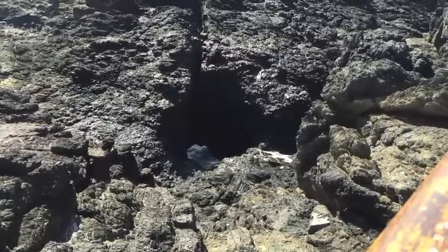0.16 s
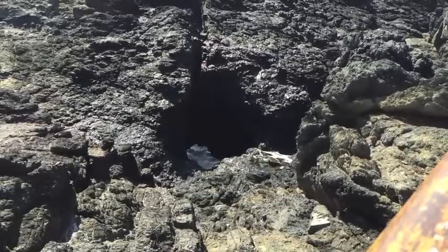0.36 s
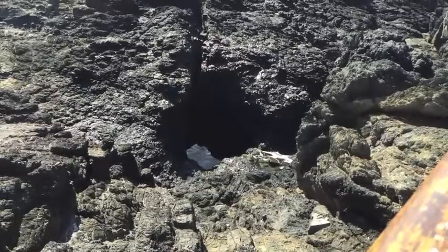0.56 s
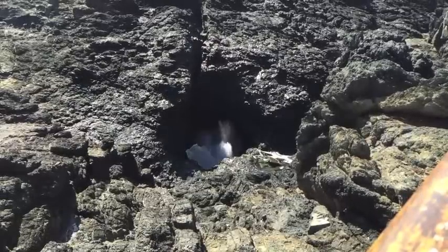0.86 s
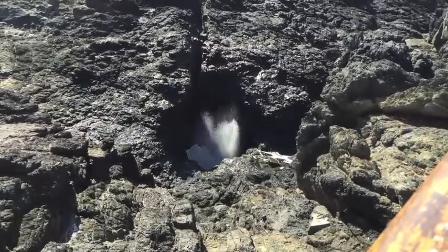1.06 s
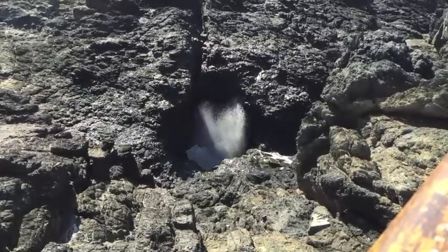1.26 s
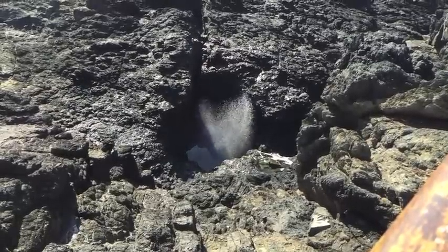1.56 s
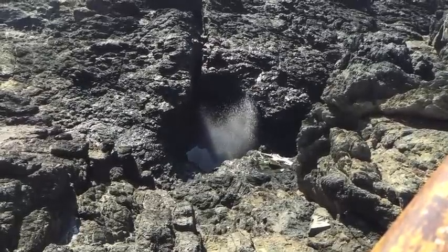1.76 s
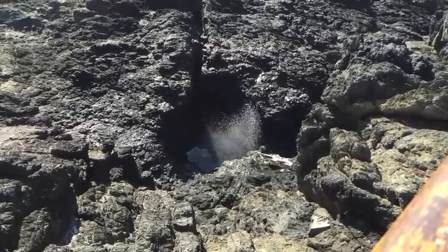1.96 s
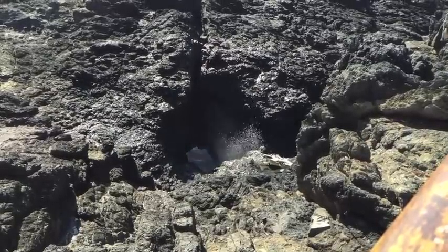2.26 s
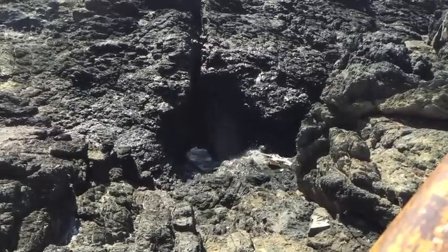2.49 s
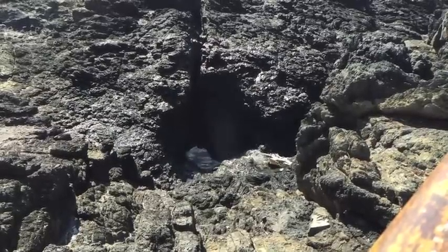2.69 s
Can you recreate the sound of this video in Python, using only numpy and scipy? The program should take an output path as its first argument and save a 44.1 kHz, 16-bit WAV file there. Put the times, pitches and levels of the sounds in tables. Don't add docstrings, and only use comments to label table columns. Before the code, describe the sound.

Water surges and sprays from a rock cavity outdoors; sloshing slaps come first, a softer wash follows, then a longer spray rush, while fluttering wind rumble thumps the microphone, easing midway and peaking near the end.

```python
import sys
import numpy as np
from scipy import signal
from scipy.fft import rfft, irfft
from scipy.io import wavfile
from scipy.ndimage import uniform_filter1d

SR = 44100
rng = np.random.default_rng(int(sys.argv[2]) if len(sys.argv) > 2 else 0)


def voltage_ratio(level):
    return 10 ** (np.asarray(level, float) / 20)


def transcribe(u):
    v = np.clip(np.atleast_2d(u).T, -1, 1)
    q = np.round(v * 32767).astype(np.int16)
    wavfile.write(sys.argv[1], SR, q)


N = 124803
T = np.arange(N) / SR
F = np.maximum(np.arange(N // 2 + 1) * SR / N, 1.)


def unit(x):
    return x / np.sqrt(np.mean(x ** 2))


def walk(rate_hz):
    hold = int(SR / rate_hz)
    steps = np.repeat(rng.standard_normal(N // hold + 1), hold)
    return unit(uniform_filter1d(uniform_filter1d(steps, hold), hold)[:N])


def textured(source, colour, shared_db, own_db, rate_hz):
    hz, db = np.array(colour).T
    below_octaves = np.maximum(np.log2(hz[0] / F), 0)
    spectrum = rfft(source) * voltage_ratio(np.interp(np.log(F), np.log(hz), db) - 26 * below_octaves)
    out, swell = 0, walk(rate_hz / 3)
    for centre in np.arange(np.log2(hz[0]) - 1, np.log2(hz[-1]) + .5, .5):
        band = np.cos(np.pi * np.clip(np.log2(F) - centre, -.5, .5)) ** 2
        out = out + irfft(spectrum * band, N) * voltage_ratio(shared_db * swell + own_db * walk(rate_hz))
    return unit(out)


def add_swing(out, at_s, db, hz, width_s, phase):
    sag = 0.23
    first = max(0, int((at_s - 4 * width_s) * SR))
    i = np.arange(first, min(N, int((at_s + 4 * width_s) * SR)))
    u = i / SR - at_s
    bell = np.exp(-.5 * (u / width_s) ** 2)
    turns = hz * u * (1 - sag * np.tanh(u / width_s / 2))
    out[i] += voltage_ratio(db) * bell * np.cos(2 * np.pi * turns + phase)


def eddies(rows):
    crest_spread_rad = 0.67
    eddy_turns, wake_turns, wake_late_turns = 0.53, 0.75, 0.59
    wake_db, wake_slower = -3, 0.56
    out = np.zeros(N)
    phases = crest_spread_rad * rng.standard_normal((len(rows), 2))
    for (at_s, db, hz), (p, q) in zip(rows, phases):
        add_swing(out, at_s, db, hz, eddy_turns / hz, p)
        slow_hz = hz * wake_slower
        add_swing(out, at_s + wake_late_turns / hz, db + wake_db, slow_hz, wake_turns / slow_hz, q)
    return out


def surge_power(at_s, db, rise_s, fall_s):
    rise = np.exp(-2 * ((T - at_s) / rise_s) ** 2)
    return voltage_ratio(2 * db) * np.where(T < at_s, rise, voltage_ratio(-120 * (T - at_s) / fall_s))


def gusts():
    # (time [s], level [dB])
    gust_levels = [(0, -33), (.07, -32.5), (.15, -27), (.32, -30.5), (.57, -31.5), (.7, -29), (.84, -37),
                   (1.0, -41), (1.25, -38), (1.37, -38), (1.41, -46), (1.6, -40), (1.79, -42.5),
                   (2.21, -34), (2.45, -43), (2.618, -37), (2.72, -27), (2.83, -38)]
    # (frequency [Hz], density [dB per Hz])
    rumble_colour = [(25, -28), (45, -2.5), (75, -1), (150, -3.5), (250, -13.5), (400, -20), (700, -22.5),
                     (900, -76)]
    stray_count, stray_hz, stray_spread, stray_scatter_db, stray_db = 260, 150, 0.36, 4, -2.5
    rumble = textured(rng.standard_normal(N), rumble_colour, shared_db=1.5, own_db=2.3, rate_hz=45)
    at_s = rng.uniform(0, N / SR, stray_count)
    db = stray_scatter_db * np.minimum(rng.exponential(size=stray_count), 2.5)
    hz = np.minimum(stray_hz * np.exp(stray_spread * rng.standard_normal(stray_count)), 650)
    stray = unit(eddies(list(zip(at_s, db, hz))))
    return (rumble + voltage_ratio(stray_db) * stray) * voltage_ratio(np.interp(T, *np.array(gust_levels).T))


def surf():
    # (frequency [Hz], density [dB per Hz])
    surf_colour = [(150, 6.5), (450, -7.5), (700, -0.5), (1100, -1.5), (2000, -6.5), (4000, -9.5),
                   (8000, -15), (15500, -23)]
    # (time [s], level [dB])
    treble_ebb = [(0, -5), (.5, 2), (.93, -0.5), (1.06, -3), (1.2, -3), (1.38, -5), (2.6, 8), (2.83, -2)]
    # (time [s], level [dB])
    surf_swell = [(0, -0.5), (.15, 1.5), (.4, -0.5), (.9, -0.5), (1.15, 1), (1.3, -0.5), (2.0, 0),
                  (2.83, -1)]
    surf_db = -44.5
    wash = textured(rng.standard_normal(N), surf_colour, shared_db=0.3, own_db=1.04, rate_hz=13.6)
    treble = signal.sosfilt(signal.butter(1, 4000, "high", fs=SR, output="sos"), wash)
    wash = wash + treble * (voltage_ratio(np.interp(T, *np.array(treble_ebb).T)) - 1)
    return voltage_ratio(surf_db + np.interp(T, *np.array(surf_swell).T)) * wash


def flutters():
    # (start [s], length [s], peak [dB], swing rate [Hz])
    runs = [
        (0.00197, 0.029, -25, 260),
        (0.0034, 0.012, -25.5, 450),
        (.1, 0.09, -22, 170),
        (2.675, 0.053, -28.5, 450),
        (2.5, 0.045, -34, 150),
    ]
    gap_turns, spread, uneven_db = 1.6, 0.205, 1.5
    rows = []
    for start_s, length_s, db, hz in runs:
        a, b, c = rng.standard_normal((30, 3)).T
        at_s = start_s + np.cumsum(gap_turns / hz * np.exp(spread * a))
        fade_db = -40 * np.maximum((at_s - start_s) / length_s - 1, 0) ** 2
        rows += zip(at_s, db + fade_db + uneven_db * b, hz * np.exp(spread * c))
    return eddies(rows)


def slosh():
    # (time [s], level [dB], rise [s], fall t60 [s])
    sloshes = [
        (.006, -40, .003, .12),
        (.15, -52, .05, .8),
        (.31, -44, .05, 1.3),
        (.45, -47, .05, .8),
        (.57, -37.5, .04, 0.65),
        (.66, -47, .03, .6),
        (1.3, -54.5, 0.11, 1.3),
        (1.54, -51, .06, 1.5),
    ]
    # (frequency [Hz], density [dB per Hz])
    hollow_colour = [(350, -4), (550, -0.5), (750, 0.5), (950, -2.5), (1300, -15), (2000, -25)]
    power = sum(surge_power(*row) for row in sloshes)
    hollow = textured(rng.standard_normal(N), hollow_colour, shared_db=2.0, own_db=1.5, rate_hz=28)
    return np.sqrt(power) * hollow


def buffets():
    # (time [s], peak [dB], swing rate [Hz])
    early_buffets = [(0.016, -16, 270), (0.09, -22.5, 388), (0.102, -19.5, 540), (0.115, -16, 230),
                     (0.131, -23, 420), (0.146, -18.5, 196), (0.164, -28, 224.4), (0.196, -19, 386),
                     (0.217, -18, 190), (0.236, -28, 175), (0.255, -12.5, 247), (0.286, -13, 250),
                     (0.358, -17.5, 195), (0.371, -20, 161), (0.397, -15, 254), (0.424, -19, 330),
                     (0.443, -23.5, 387), (0.499, -21.5, 176.0), (0.603, -19.5, 298), (0.624, -18.5, 205),
                     (0.642, -25, 175), (0.656, -33, 276), (0.694, -25.5, 141), (0.724, -21.5, 155),
                     (0.767, -29.5, 222.0), (0.781, -23, 172), (0.815, -23, 154), (0.821, -27.5, 563),
                     (0.828, -32, 122.5)]
    # (time [s], peak [dB], swing rate [Hz])
    mild_buffets = [(.249, -18.5, 560), (.263, -23, 144), (.3, -26, 260), (.318, -25, 200),
                    (.508, -27, 266), (.516, -23.5, 335), (.529, -26, 150), (.537, -32, 480),
                    (.553, -31, 620), (.611, -22, 216), (.674, -28, 302), (.8, -30, 282), (1.213, -24, 170),
                    (1.224, -26, 150), (1.233, -33.5, 400), (1.293, -26, 200), (1.32, -26, 245),
                    (1.381, -26, 192), (1.472, -32.5, 196), (1.728, -27, 130), (1.742, -28.5, 168),
                    (1.853, -28.5, 170), (1.886, -32, 169), (1.985, -28, 325), (2.022, -32, 150),
                    (2.3, -28, 130), (2.331, -27, 228), (2.388, -27, 202), (2.48, -27.5, 135),
                    (2.585, -28, 300), (2.6, -22, 130)]
    # (time [s], peak [dB], swing rate [Hz])
    late_buffets = [(1.04, -21, 597), (1.054, -24, 420), (1.068, -32, 175), (1.204, -25.5, 422),
                    (1.237, -24.5, 160), (1.265, -28, 175), (1.302, -24.0, 370), (1.315, -26, 295),
                    (1.39, -23, 252), (1.562, -27.5, 198), (1.688, -23.5, 286), (1.751, -23.5, 192),
                    (1.97, -28, 245), (1.992, -24.0, 272), (2.054, -28, 280.0), (2.063, -25.5, 98.0),
                    (2.088, -24.5, 156), (2.127, -23, 171), (2.15, -26, 176.0), (2.203, -19.5, 156.4),
                    (2.225, -20, 192), (2.267, -25, 234), (2.342, -18.5, 193), (2.378, -18, 244),
                    (2.425, -21.5, 169), (2.517, -28, 211), (2.561, -24.5, 283), (2.572, -17, 214),
                    (2.634, -18.5, 264), (2.657, -15.5, 373)]
    # (time [s], peak [dB], swing rate [Hz])
    last_gust = [(2.668, -13.5, 170), (2.682, -20, 400), (2.689, -15.5, 200), (2.7, -18, 257),
                 (2.706, -15.5, 224), (2.712, -27, 600), (2.72, -20, 380), (2.729, -13, 168),
                 (2.737, -27.5, 556), (2.744, -13.5, 138), (2.756, -19.5, 200), (2.772, -19, 233),
                 (2.785, -27, 201), (2.802, -30, 170), (2.809, -25, 302), (2.824, -30, 130)]
    return eddies(early_buffets) + eddies(mild_buffets) + eddies(late_buffets) + eddies(last_gust)


def heaves():
    # (onset [s], peak [dB], swing rate [Hz])
    heave_rows = [(0.134, -26.5, 75), (0.177, -20, 83.4), (0.251, -20, 128), (0.382, -17, 127),
                  (0.489, -18.5, 96.5), (0.589, -21.5, 84), (0.684, -18.5, 92), (1.031, -23, 76.5),
                  (1.278, -29, 78.1), (1.64, -25, 67.3), (1.7, -23, 54.7), (1.79, -30, 42),
                  (1.835, -28, 86), (1.93, -29, 55.5), (1.978, -24, 93), (2.053, -24, 71),
                  (2.116, -20.5, 115), (2.189, -21, 121.6), (2.21, -27, 48), (2.276, -25, 48),
                  (2.331, -20.5, 75.4), (2.47, -26, 60), (2.542, -25, 77), (2.725, -11.5, 80)]
    rise_s, width_s = 0.0202, 0.012
    out = np.zeros(N)
    for onset_s, db, hz in heave_rows:
        add_swing(out, onset_s + rise_s, db - 3, hz, width_s, rng.uniform(-np.pi, np.pi))
    return out


def drops():
    drops_per_s, scatter_db, share = 5000, 1.5, 0.22
    n = int(drops_per_s * N / SR)
    clicks = np.zeros(N)
    sizes = voltage_ratio(scatter_db * np.minimum(rng.exponential(size=n), 4.5))
    np.add.at(clicks, rng.integers(0, N, n), rng.choice([-1, 1], n) * sizes)
    return np.sqrt(share) * unit(clicks) + np.sqrt(1 - share) * rng.standard_normal(N)


def surges():
    # (time [s], level [dB], rise [s], fall t60 [s], spray share [0-1])
    surge_rows = [(.325, -38, 0.077, 1.7, 0.07), (.33, -45, .07, 0.54, 0.95),
                  (.578, -36, 0.031, 0.46, 0.02), (.625, -42.5, 0.06, 0.9, 0.85), (.80, -47, .03, 0.24, 0),
                  (1.45, -44.5, 0.13, 9.8, 0.03), (1.63, -38.5, 0.13, 3.7, 0.28),
                  (1.93, -42, 0.15, 3.8, 0.53), (2.3, -46, 0.61, 5.5, 0.9), (2.62, -40.5, 0.049, 2, .95),
                  (2.69, -56, .02, 1.3, .95)]
    # (frequency [Hz], density [dB per Hz])
    churn_colour = [(300, -4), (450, -6), (700, 2.5), (1100, 2.5), (2000, -7), (4000, -14), (8000, -28.5),
                    (15500, -23)]
    # (frequency [Hz], density [dB per Hz])
    spray_colour = [(400, -18), (1000, -20), (2500, 0), (6000, -3.5), (9000, -8.5), (12000, -15),
                    (15500, -16.5)]
    end_s, end_db, end_fade_s = 2.5, -7, 0.033
    ending = voltage_ratio(end_db * (1 + np.tanh((T - end_s) / end_fade_s)))
    churn_power = spray_power = 0
    for at_s, db, rise_s, fall_s, bright in surge_rows:
        power = surge_power(at_s, db, rise_s, fall_s) * ending
        churn_power = churn_power + (1 - bright) * power
        spray_power = spray_power + bright * power
    churn = textured(drops(), churn_colour, shared_db=-0.7, own_db=1.2, rate_hz=26)
    spray = textured(drops(), spray_colour, shared_db=0.3, own_db=0.9, rate_hz=30)
    return np.sqrt(churn_power) * churn + np.sqrt(spray_power) * spray


def scene():
    port_top_hz = 750
    wind = gusts() + flutters() + buffets() + heaves()
    wind = irfft(rfft(wind) / np.sqrt(1 + (F / port_top_hz) ** 15), N)
    return (wind + surf() + slosh() + surges())[None]


def top_cut(x):
    return signal.sosfilt(signal.butter(12, 15490, fs=SR, output="sos"), x)


def record(dry):
    # (frequency [Hz], width [Hz], boost [dB])
    casing = [(480, 160, -3), (1994, 558, 8.5), (2860, 1150, 4), (3264, 260, -4), (4940, 560, -6),
              (6500, 1900, 2), (7650, 650, -2.5), (10400, 410, -4.5), (11300, 500, -0.5)]
    top_hz, low_cut_hz = 15230, 40
    duck_top_db, duck_ratio, duck_s = -21, 3.4, 0.027
    db = sum(boost * np.exp(-.5 * ((F - hz) / width * 2) ** 2) for hz, width, boost in casing)
    x = irfft(rfft(dry) * voltage_ratio(db) * (F < top_hz), N)
    x = signal.sosfilt(signal.butter(3, low_cut_hz, "high", fs=SR, output="sos"), x)
    a = 1 / (duck_s * SR)
    level = np.sqrt(signal.lfilter([a], [1, a - 1], x ** 2) + 1e-12)
    x = x * np.minimum(voltage_ratio(duck_top_db) / level, 1) ** (1 - 1 / duck_ratio)
    return top_cut(x)


dry = scene()
out = record(dry)
transcribe(out)
```